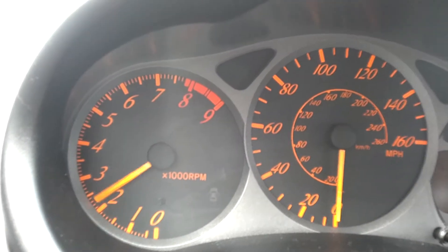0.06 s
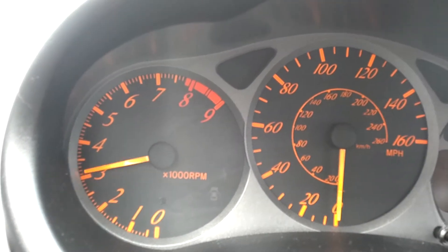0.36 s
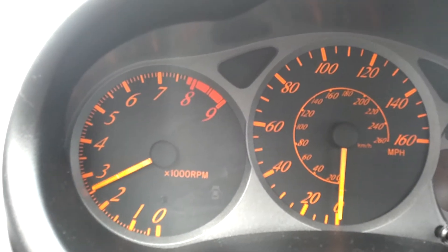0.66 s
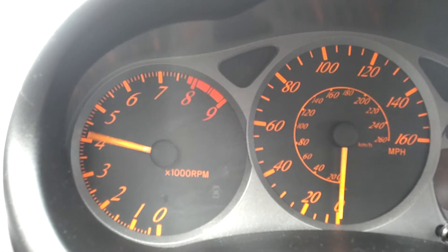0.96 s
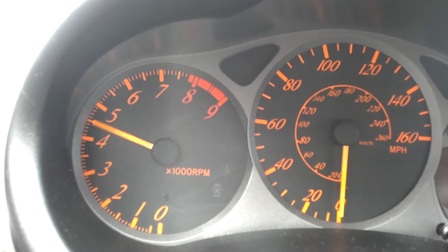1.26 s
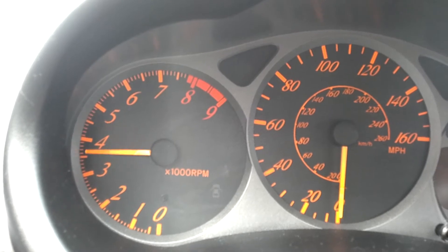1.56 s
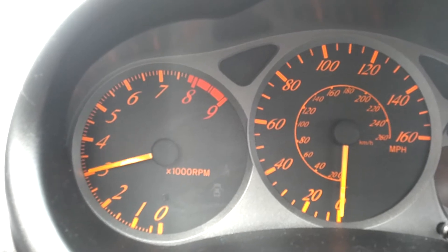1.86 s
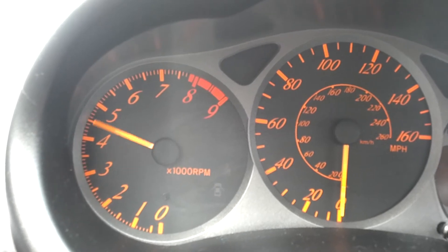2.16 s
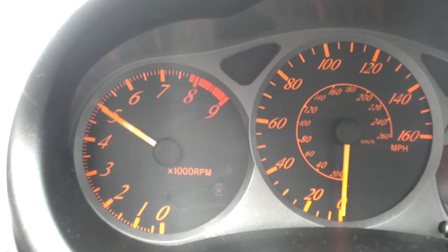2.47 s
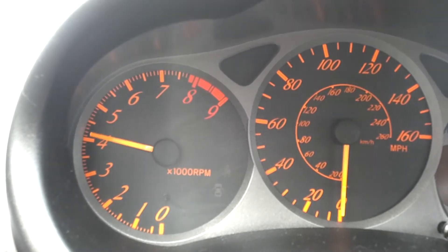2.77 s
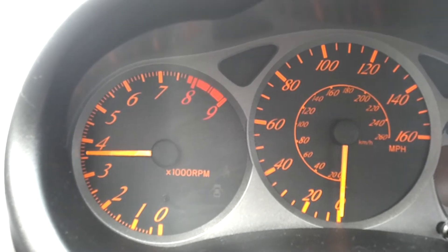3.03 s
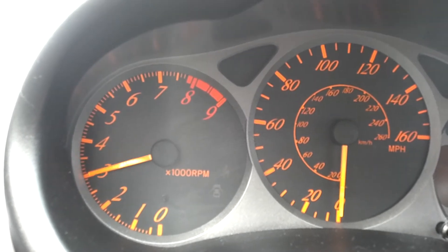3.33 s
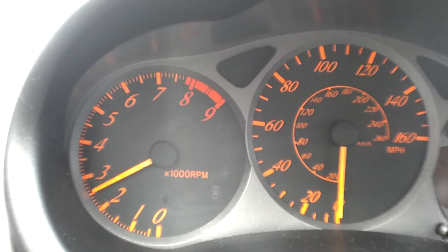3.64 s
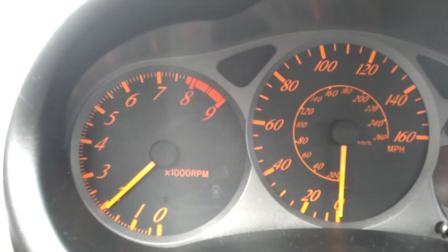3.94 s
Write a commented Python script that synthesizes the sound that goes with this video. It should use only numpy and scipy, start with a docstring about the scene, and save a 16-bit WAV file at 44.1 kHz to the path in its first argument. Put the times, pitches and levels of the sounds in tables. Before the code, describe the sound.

A parked car's engine revving up and down three times, booming through the cabin.

```python
"""Driver's seat of a parked car, on a closely spaced stereo microphone: the four-cylinder revs three times.
Each push of the pedal makes the intake growl; then the firing note booms through the cabin and sinks.
Combustion roar and mechanical hiss pulse with the firings. Two dry knocks sound near the microphone,
with two dull thuds and a faint rumble of the body behind them."""
import sys
import numpy as np
from scipy import signal
from scipy.fft import rfft, irfft
from scipy.io import wavfile

SR = 44100
rng = np.random.default_rng(int(sys.argv[2]) if len(sys.argv) > 2 else 0)


def master(y):
    """Save y as 16-bit WAV."""
    cut = np.clip(np.atleast_2d(y).T, -1, 1)
    pcm = np.round(cut * 32767)  # scale
    wavfile.write(sys.argv[1], SR, pcm.astype(np.int16))


N = 176400
T = np.arange(N) / SR

# Engine speed through the three revs: time_s, firing_hz
ENGINE_SPEED = [(0.0, 59.62), (0.2, 103.3), (0.34, 110.3), (0.4, 108.1), (0.54, 98.1), (0.62, 90.27),
                (0.7, 83.4), (0.76, 92), (0.88, 121.5), (0.92, 127), (1.04, 156.1), (1.08, 163.9),
                (1.16, 164.3), (1.26, 158.0), (1.68, 115.8), (1.74, 113.5), (1.88, 102.3), (1.94, 103.8),
                (1.96, 105.2), (2.26, 176.9), (2.32, 180.5), (2.46, 174.3), (2.56, 164), (2.84, 139.8),
                (3.14, 117.1), (3.28, 110.3), (3.34, 105.5), (3.42, 101.7), (3.62, 87.25), (3.76, 79.98),
                (3.99, 66.17)]

def revving(jitter=.002):
    """The firing rate, and the running count of firings with a slight unevenness of speed."""
    firing_hz, = in_time(ENGINE_SPEED)
    cycles = np.cumsum(firing_hz * (1 + jitter * drift(39.78))) / SR
    return cycles, firing_hz

# The firing note at the driver's seat: time_s, relative_db
BOOM_LEVEL = [(0.0, -47), (0.14, -32), (0.22, -44), (0.28, -32.1), (0.42, -33.5), (0.44, -39.5),
              (0.6, -32.3), (0.72, -41.4), (0.74, -31), (0.87, -30.5), (0.905, -46), (0.94, -28.5),
              (0.965, -39), (1.0, -27), (1.04, -39), (1.08, -24), (1.26, -25.5), (1.3, -36), (1.38, -25),
              (1.46, -30.5), (1.5, -25.5), (1.58, -34), (1.62, -27.5), (1.68, -37), (1.72, -26),
              (1.8, -32.5), (1.9, -46), (2.0, -37), (2.04, -47), (2.08, -33), (2.12, -38), (2.18, -22.5),
              (2.4, -28.5), (2.42, -24.5), (2.52, -29.5), (2.6, -24), (2.66, -35), (2.74, -27),
              (2.98, -28.5), (3.02, -36), (3.05, -27.5), (3.14, -36.5), (3.2, -26.5), (3.26, -29.5),
              (3.4, -38.5), (3.52, -33), (3.66, -37), (3.7, -48.7), (3.74, -38), (3.84, -43), (3.88, -38),
              (3.99, -43)]
# Its harmonics: time_s, second_db, third_db, fourth_db
OVERTONE_LEVELS = [(0.0, -39, -32.5, -38.5), (0.1, -26, -36, -35.5), (0.15, -41.5, -37, -47),
                   (0.28, -28, -37, -42.5), (0.38, -34, -38, -39), (0.48, -35, -40, -49),
                   (0.72, -30.5, -51, -37.5), (0.76, -40, -30, -39), (0.84, -23, -32, -36.5),
                   (0.89, -38, -38.5, -40.5), (0.96, -29, -37.5, -49), (1.08, -36, -29.5, -45),
                   (1.2, -38, -34.5, -45), (1.32, -34.5, -47, -41.5), (1.44, -41.5, -34.5, -46),
                   (1.5, -41, -52, -45.5), (1.64, -38.5, -38, -49.5), (1.8, -45, -39.5, -41),
                   (2.04, -36, -42.5, -43), (2.16, -30.5, -34, -48), (2.2, -37.5, -42, -51),
                   (2.28, -35.5, -35.5, -37), (2.44, -35, -33.5, -36.5), (2.52, -55, -40.5, -47),
                   (2.56, -33, -47, -37.5), (2.82, -37, -31, -48.5), (2.92, -43.5, -44, -56),
                   (3.1, -37.5, -37.5, -44), (3.32, -46, -43, -34), (3.44, -29.5, -40, -50),
                   (3.56, -38, -54, -43), (3.7, -27, -41, -34), (3.78, -40, -39.5, -35.5),
                   (3.99, -45.5, -39.5, -76)]
# Crank orders at 1.5 and 2.5 times the firing rate: time_s, third_relative_db, fifth_relative_db
CRANK_LEVELS = [(0.0, -45, -47), (1.04, -40, -33), (1.1, -32, -45), (1.24, -61, -52), (1.42, -28.5, -37),
                (1.52, -41.5, -42), (2.06, -41.5, -41.5), (2.36, -27, -44), (2.46, -27.5, -35.5),
                (2.54, -55, -66), (2.84, -34.5, -43), (3.16, -47, -36), (3.24, -37, -50), (3.44, -41, -43),
                (3.99, -66, -60)]

def exhaust(cycles, firing_hz):
    """The firings boom through the cabin: one note, three overtones and two crank orders between them."""
    boom_db, = in_time(BOOM_LEVEL)
    out = from_db(boom_db - .5) * partial(cycles, firing_hz, 1, flutter=.07)
    for multiple, db in zip((2, 3, 4), in_time(OVERTONE_LEVELS)):
        out += from_db(db) * partial(cycles, firing_hz, multiple, flutter=.2)
    for multiple, db in zip((1.5, 2.5), in_time(CRANK_LEVELS)):
        out += from_db(db - 2) * partial(cycles, firing_hz, multiple, flutter=.2)
    return out

# Intake barks as the throttle opens: start_s, hold_s, level_db, pitch_hz
PEDAL_PUSHES = [(0.06, 0.047, -29.5, 276), (.736, 0.035, -26, 273), (0.924, 0.075, -32, 279.3),
                (2.07, 0.091, -29.5, 257), (2.12, 0.046, -27.5, 306)]

def intake(cycles, width_hz=87, roughness=.95, attack_s=.007, release_s=.012):
    """While the throttle is open, uneven gulps of air ring the intake resonance."""
    firings = np.diff(np.floor(cycles), prepend=0)
    gulps = rms_one(firings) + roughness * rng.standard_normal((2, N))
    out = 0
    for start, hold, db, hz in PEDAL_PUSHES:
        opening = np.clip((T - start) / attack_s, 0, 1)
        closing = np.exp(-np.maximum(T - start - hold, 0) / release_s)
        band = signal.butter(2, [hz - width_hz / 2, hz + width_hz / 2], "band", fs=SR, output="sos")
        out += from_db(db) * opening * closing * rms_one(signal.sosfilt(band, gulps))
    return out

# Swell of the roar, which the snarl follows too: time_s, relative_db
ROAR_SWELL = [(0,-47),(.1,-44.5),(.17,-45),(.36,-41),(.58,-44),(.78,-45.5),(1.1,-38),(1.3,-41.5),(1.85,-42.5),(2.0,-47.5),(2.12,-40.5),(2.4,-41.5),(2.5,-40),(2.8,-41),(3.27,-43),(3.74,-45),(4,-50)]
# The roar from inside the cabin: frequency_hz, density_db
ROAR_SPECTRUM = [(25, -46.5), (50, -31), (80, -17), (130, 0), (250, -1.5), (420, 0), (650, -5), (1000, -10),
                 (1550, -12.5), (1900, -20), (2350, -14.5), (3000, -24), (4500, -58)]

def combustion_roar(cycles):
    """Low combustion noise that throbs with the firings."""
    level_db, = in_time(ROAR_SWELL)
    roar = from_db(level_db + 7.5) * stereo_noise(ROAR_SPECTRUM) * pulsing(cycles, depth=.08)
    return signal.sosfilt(signal.butter(4, 88, "high", fs=SR, output="sos"), roar)

# Upper firing harmonics against the roar: firing_multiple, relative_db
SNARL_HARMONICS = [(5, 2.5), (6, -1.5), (8, -1), (12, -3)]
# The cabin's colouring of the weaker orders: frequency_hz, gain_db
CABIN_RESPONSE = [(42, -28), (60, -16), (85, -12.5), (120, -3), (200, -2), (270, 1), (350, -4), (440, 2.5),
                  (530, -8.5), (620, -7), (730, -4.5), (850, -16), (980, -5.5), (1150, -21), (1550, -14.5),
                  (2500, -40)]

def snarl(cycles, firing_hz, crank_db=-3.5, cam_db=-11.5, ripple_db=4.5, ripple_spacing_hz=21.99):
    """Unequal cylinders give lines at multiples of the cam rate, swept through cabin peaks and dips."""
    roar_db, = in_time(ROAR_SWELL)
    level_db = roar_db + .5 * np.log2(firing_hz / 140)  # stands out more at high speed
    out = np.zeros((2, N))
    for cam_order in range(2, 57):
        multiple = cam_order / 4
        in_exhaust = multiple in (1, 1.5, 2, 2.5, 3, 4)
        if in_exhaust or (cam_order % 2 and multiple > 6):
            continue
        if cam_order % 4 == 0:
            order_db = on_log_axis(SNARL_HARMONICS, multiple)
        else:
            order_db = cam_db if cam_order % 2 else crank_db
        hz = multiple * firing_hz
        # the cabin's fine peaks and dips also scatter the phase between left and right
        ripple, scatter = (np.interp(hz / ripple_spacing_hz, np.arange(400), points)
                           for points in rng.standard_normal((2, 400)))
        gain = from_db(level_db + order_db + on_log_axis(CABIN_RESPONSE, hz) + ripple_db * ripple)
        out += gain * partial(cycles, firing_hz, multiple, flutter=.3, scatter_rad=.89 * scatter)
    return out

# Swell of the hiss and of the fizz on top: time_s, hiss_relative_db, fizz_relative_db
HISS_SWELL = [(0,-68.5,-63),(.1,-57,-56),(.15,-65,-62.5),(.36,-57,-53),(.55,-61.5,-63.5),(.7,-60,-58),(.77,-64.5,-61.5),(1.1,-56,-59.5),(1.27,-59.5,-64),(1.6,-59,-62),(1.87,-59,-57.5),(2.0,-64.5,-63.5),(2.12,-60,-62.5),(2.4,-57.5,-63.5),(2.8,-59.5,-63),(3.1,-59,-61.5),(3.28,-59,-58.5),(3.48,-62.5,-64),(3.63,-62,-60.5),(4,-65.5,-65)]
# Hiss and fizz at the seat: frequency_hz, density_db
HISS_SPECTRUM = [(1500, -27), (3000, 6), (4200, 4.5), (5500, -3), (7500, -7.5), (10000, -76), (16000, -38)]
FIZZ_SPECTRUM = [(4000, -14), (7000, -3), (10000, 2), (13000, -2.5), (15500, 8)]

def mechanical_hiss(cycles):
    """The moving parts hiss, pulsing with the firings."""
    hiss_db, fizz_db = in_time(HISS_SWELL)
    hiss = from_db(hiss_db + 3) * stereo_noise(HISS_SPECTRUM)
    fizz = from_db(fizz_db + 1.5) * stereo_noise(FIZZ_SPECTRUM)
    return (hiss + fizz) * pulsing(cycles, depth=.077)

# Two dry knocks close to the microphone, with a very faint high tick just after the first:
# start_s, level_db, tilt_db_per_octave
KNOCK_HITS = [(1.9491, -6, 0.5), (1.9605, -40, 7.5), (2.46, -10.5, -6)]
# Ring of the hard plastic: pitch_hz, relative_db, t60_s
PLASTIC_MODES = [(1610, -3.5, 0.005), (1999.5, -4.5, 0.0027), (4220, -11, 0.00076), (6520, -19, 0.002),
                 (12200, -14, 0.0005)]
PORT_LAG_S = .0003648  # between the microphone's two ports

def knocks(low_cut_hz=1300):
    """Struck plastic rings briefly; the right port hears it a little later and inverted."""
    out = np.zeros((2, N))
    for start, db, tilt in KNOCK_HITS:
        age = np.maximum(T - start - np.array([[0], [PORT_LAG_S]]), 0)
        for hz, mode_db, t60 in PLASTIC_MODES:
            tilt_db = tilt * np.log2(hz / PLASTIC_MODES[0][0])
            decay_db = 60 * np.minimum(age / t60, 10)
            out += from_db(db + mode_db + tilt_db - decay_db) * np.sin(2 * np.pi * hz * age)
    low_cut = signal.butter(2, low_cut_hz, "high", fs=SR, output="sos")
    return signal.sosfilt(low_cut, out) * [[1], [-1]]

# Dull thuds in the cabin, the second as the throttle snaps open: start_s, level_db
THUD_HITS = [(0.514, -30), (0.743, -25.5)]

def thuds(band_hz=(397, 950), t60_s=.028):
    """Muffled bumps that start at once and die quickly."""
    band = signal.butter(3, band_hz, "band", fs=SR, output="sos")
    envelope = sum((T > start) * from_db(db - 60 * np.clip((T - start) / t60_s, 0, 5))
                   for start, db in THUD_HITS)
    noise = rng.standard_normal(N)
    return signal.sosfilt(band, envelope * noise) / np.std(signal.sosfilt(band, noise))

# The car's body all around the seat: frequency_hz, density_db
RUMBLE_SPECTRUM = [(20, -21), (60, 8), (200, -19), (1000, -61)]

def body_rumble(level_db=-73):
    """The body rumbles faintly and steadily under everything."""
    return from_db(level_db) * stereo_noise(RUMBLE_SPECTRUM)

# Phase of a tone at the microphone: pitch_hz, left_lead_rad
TONE_LEAD = [(70, -2), (90, -1.53), (110, -1), (133, 0.5), (139, -1.5), (144, -5), (152, -6), (164, -5),
             (174, -0.6), (185, -1.5), (215, -1.4), (270, -1.5), (360, -1.04), (430, -0.3), (485, 1.5),
             (545, -0.5), (700, 0.4), (1000, 0)]
# Its balance there: pitch_hz, left_minus_right_db
TONE_BALANCE = [(90, -1), (150, 0), (180, -1), (200, 1), (215, -10), (240, 3), (265, 0.5), (290, -4),
                (320, 8.5), (360, -5.5), (420, 5), (480, 2), (520, 4), (620, -2.5), (900, 0)]

def partial(cycles, firing_hz, multiple, flutter, scatter_rad=0):
    """One fluttering engine order, placed in stereo by the cabin's standing waves."""
    hz = multiple * firing_hz
    sides = np.array([[.5], [-.5]])
    lead = on_log_axis(TONE_LEAD, hz) + scatter_rad
    angle = 2 * np.pi * (multiple * cycles + rng.random()) + lead * sides
    gain = from_db(on_log_axis(TONE_BALANCE, hz) * sides)
    tone = (1 + flutter * drift(45)) * np.sin(angle) + flutter * drift(45) * np.cos(angle)
    return 2 * gain / np.hypot(*gain) * tone

# Stereo width of the low noise at the microphone: frequency_hz, side_minus_mid_db
NOISE_WIDTH = [(60, -7), (200, -1), (400, 0.5), (700, -5), (1300, -26)]

def stereo_noise(spectrum, crossover_hz=1320, port_leak=.023):
    """Coloured noise at two close ports, whose treble swings between mid and side with frequency."""
    hz = np.fft.rfftfreq(N, 1 / SR)
    mid, side = rfft(rng.standard_normal((2, N))) * from_db(on_log_axis(spectrum, hz))
    turn = np.pi * hz * PORT_LAG_S
    treble_width = np.hypot(np.cos(turn), from_db(-15.5)) / np.hypot(np.sin(turn), port_leak)
    width = np.where(hz < crossover_hz, from_db(on_log_axis(NOISE_WIDTH, hz)), treble_width)
    left_right = (mid + side * width * [[1], [-1]]) / np.hypot(1, width)
    return rms_one(irfft(left_right, N))

def pulsing(cycles, depth):
    """A swell once per firing, at unit rms."""
    return rms_one(np.exp(depth * np.cos(2 * np.pi * cycles)))

def drift(rate_hz):
    """Smooth random wander at unit rms."""
    points = signal.resample(rng.standard_normal(256), 4096)
    return rms_one(np.interp(T * rate_hz, np.arange(len(points)) / 16, points))

def in_time(rows):
    """Each column of a timed table, at every sample."""
    times, *columns = np.transpose(rows)
    return [np.interp(T, times, column) for column in columns]

def on_log_axis(rows, frequency):
    """Read a curve on a log-frequency axis."""
    frequencies, values = np.transpose(rows)
    return np.interp(np.log(frequency + 1e-3), np.log(frequencies), values)

def from_db(db):
    """Decibels to gain."""
    return 10 ** (np.asarray(db) / 20)

def rms_one(x):
    """Scale to unit rms."""
    return x / np.sqrt(np.mean(x ** 2) + 1e-20)

def scene():
    """From the driver's seat: the revving engine, with knocks, thuds and a faint rumble."""
    cycles, firing_hz = revving()
    tones = exhaust(cycles, firing_hz) + snarl(cycles, firing_hz)
    noise = intake(cycles) + combustion_roar(cycles) + mechanical_hiss(cycles)
    return tones + noise + knocks() + body_rumble() + thuds()

def record(dry):
    """The recorder cuts the top steeply above 15.8 kHz."""
    return signal.sosfilt(signal.ellip(12, .2, 80, 15800, fs=SR, output="sos"), dry)

dry = scene()
out = record(dry)
master(out)
```